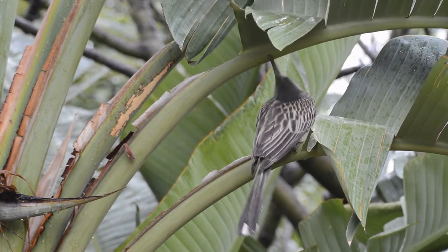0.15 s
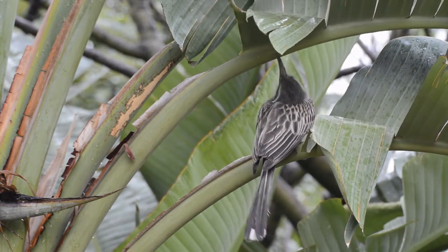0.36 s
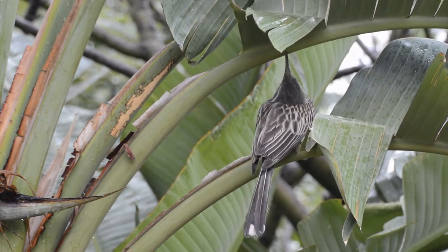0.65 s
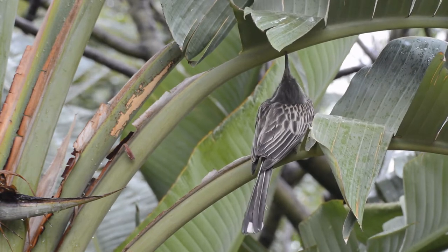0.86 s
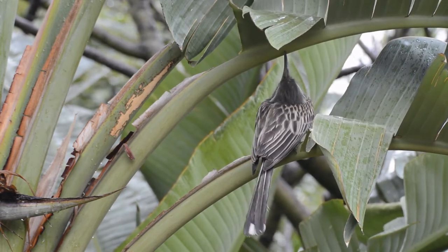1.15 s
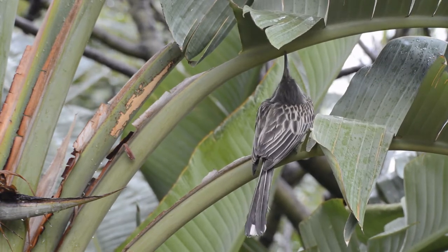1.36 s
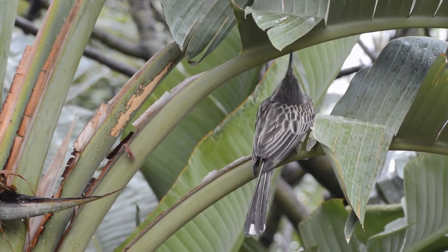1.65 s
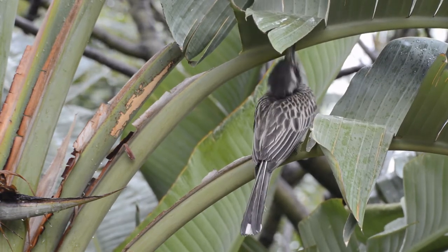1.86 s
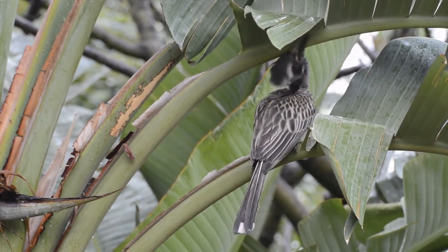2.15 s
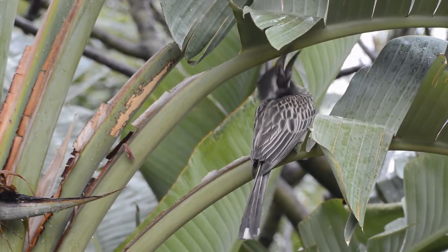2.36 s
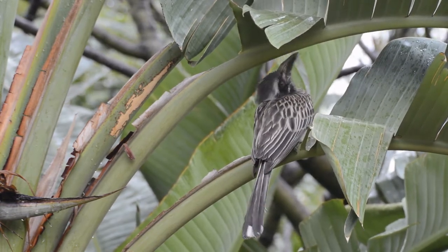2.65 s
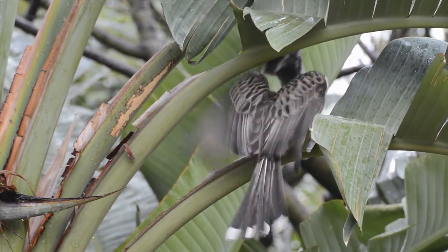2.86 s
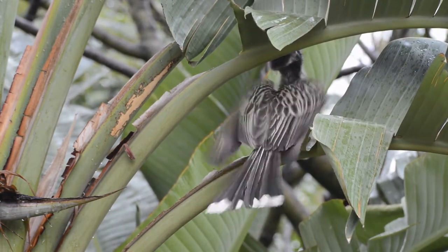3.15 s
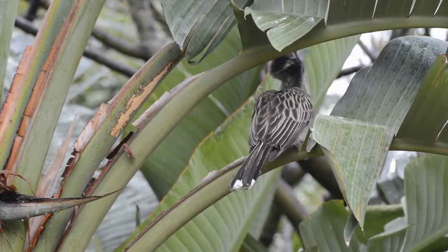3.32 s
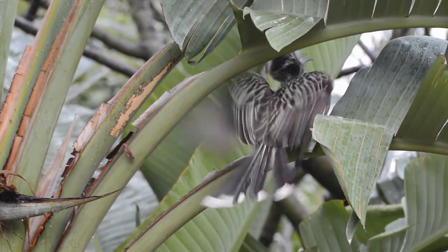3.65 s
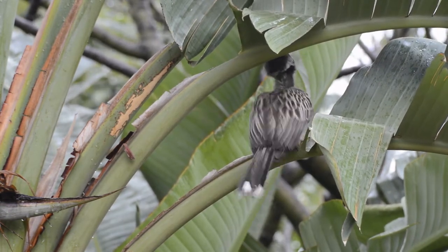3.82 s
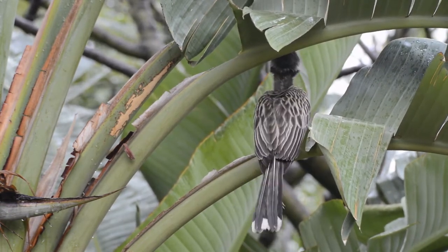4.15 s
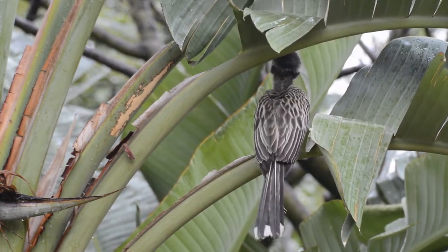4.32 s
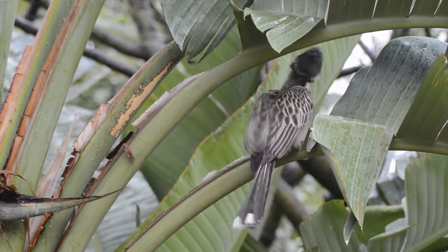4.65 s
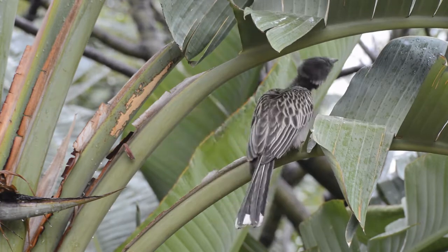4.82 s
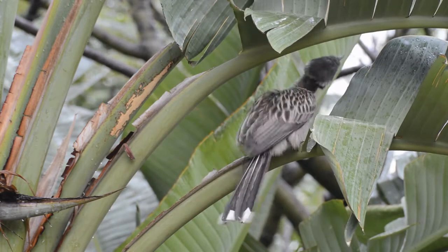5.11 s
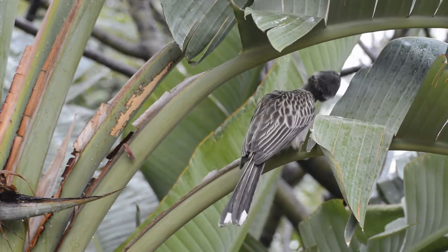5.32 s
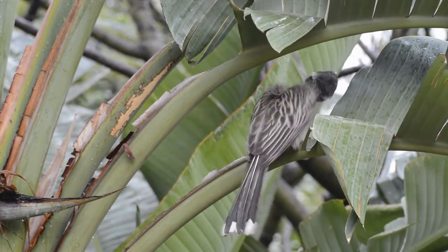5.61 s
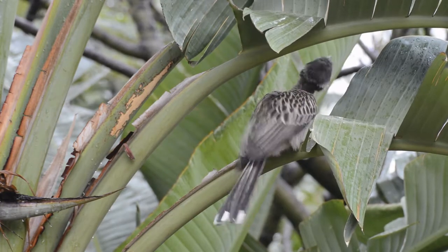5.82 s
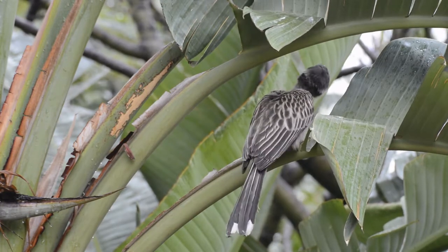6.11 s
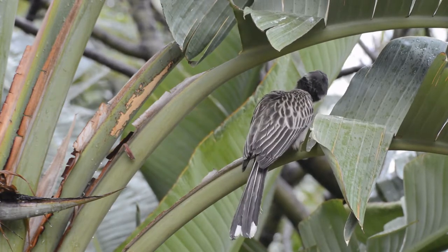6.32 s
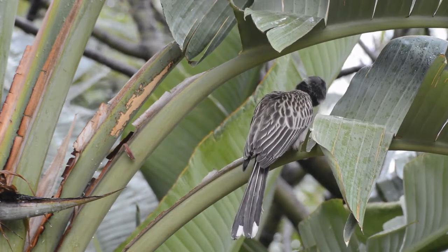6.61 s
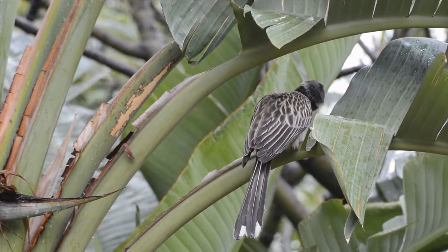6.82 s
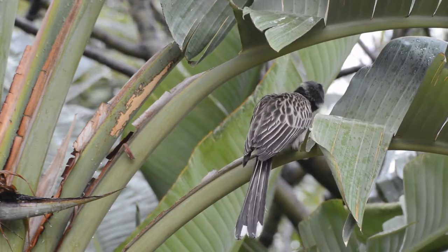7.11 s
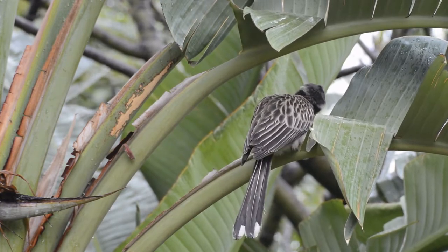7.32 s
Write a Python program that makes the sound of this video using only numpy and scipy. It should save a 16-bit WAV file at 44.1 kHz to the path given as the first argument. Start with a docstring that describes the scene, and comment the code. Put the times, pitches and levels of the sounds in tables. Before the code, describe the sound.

A quiet leafy garden in light rain: a dull, low, steady wash from distant foliage, a finer hiss nearby and small crisp drops tapping leaves. A tiny finch chirp opens it. Soft, low, flutey piping repeats roughly every 0.3 s until about 3.6 s, with faint pips early on. A dry, high insect buzz swells in pulses from 0.5 to 2 s, with weak bits until 3 s; muted dove coos come from 1.25 s. At 1.5 s a near bird whistles faintly, more clearly at 1.75 s. From 3 s two birds overlap in bright, gliding whistles, mostly falling, some leaping up and cracking into rasp between 3.8 and 5.7 s. They grow loudest from 4.8 s to the end at about 7.5 s. A brief wing puff comes at 6.7 s, a sharper finch chirp at 7.1 s. Trunks and a wall return short echoes.

```python
"""First come light rain, a finch chirp and soft hornbill piping; from 1.5 s two near hornbills whistle in
overlap. The place is a garden of broad leaves, with a stereo microphone; trunks and a wall return each whistled
note. The whistles are gliding sines with overtones, and rasp with half-pitch lines when the voice breaks. Rain
and drops are shaped noise; the insect is pulsed noise through wing resonances. Finch, soft piping, dove and
pips are gliding sines with a faint octave; the soft piping also carries thin 6th and 8th overtones. Source
levels, level_db, are set before the mix gains."""
import sys
import numpy as np
from scipy import signal
from scipy.fft import rfft, irfft, next_fast_len
from scipy.io import wavfile
from scipy.ndimage import uniform_filter1d, map_coordinates

SR = 44100
rng = np.random.default_rng(int(sys.argv[2]) if len(sys.argv) > 2 else 0)


def output_pcm(signal):
    """Save a mono or channel-first signal as 16-bit PCM at the path in sys.argv[1].

    Samples are clipped to [-1, 1] before scaling.
    """
    pcm = np.clip(np.atleast_2d(signal).T, -1, 1) * 32767
    wavfile.write(sys.argv[1], SR, np.round(pcm).astype(np.int16))


N = 329427  # samples, about 7.5 s


def amp(db):
    """Decibels to gain."""
    return 10 ** (np.asarray(db) / 20)


def unit(x):
    """Scales x to rms 1."""
    return x / np.sqrt(np.mean(x ** 2) + 1e-20)


def along(points, hz):
    """Interpolates (Hz, value) points on a log frequency axis."""
    f, v = np.transpose(points)
    return np.interp(np.log(hz + 1), np.log(f + 1), v)


def wobble(rate, size=N):
    """A smooth random curve with rate knots a second."""
    knots = rng.standard_normal(int(size * rate / SR) + 4)
    return map_coordinates(knots, [np.arange(size) * rate / SR])


def filtered(x, response):
    """Applies a complex response of frequency to x."""
    m = next_fast_len(N + SR // 2)
    return irfft(rfft(x, m) * response(np.fft.rfftfreq(m, 1 / SR)), m)[..., :N]


def resonances(modes):
    """Causal response of (Hz, width Hz, dB) modes, with alternating signs."""
    def response(f):
        total = 0
        for k, (centre, width, db) in enumerate(modes):
            damping = 1j * f * width
            total = total + (-1) ** k * amp(db) * damping / (centre ** 2 - f * f + damping)
        return total
    return response


def add(track, s, sound):
    """Mixes a sound into a track at time s."""
    part = track[round(s * SR):][:len(sound)]
    part += sound[:len(part)]


def whistles(table, octave_db, sag, flat):
    """Gliding sines with a faint octave; sag bends the glide, flat squares the swell."""
    out = np.zeros(N)
    for s, length, start_hz, end_hz, db in table:
        u = np.linspace(0, 1, round(length * SR))
        phase = 2 * np.pi * np.cumsum(start_hz + (end_hz - start_hz) * u ** sag) / SR
        octave = amp(octave_db) * (2 * start_hz < SR / 2) * np.sin(2 * phase)
        swell = np.abs(np.sin(np.pi * u)) ** flat
        add(out, s, amp(db) * swell * (np.sin(phase) + octave))
    return out


# Near hornbill notes: start_s, length_s, start_hz, turn_s, turn_hz, end_hz, peak_s, level_db, overtone_db
# (turn_s and peak_s count from the note's start)
HORNBILL_NOTES = [ (1.5, 0.079, 2830, 0.041, 2817, 2760, 0.044, -44, -74),
                  (1.755, 0.19, 2944, 0.048, 2925, 2510, .12, -27, -51),
                  (2.187, 0.06, 2554, 0.026, 2622, 2703, .033, -24, -60),
                  (2.252, 0.022, 2260, .014, 2258, 2280, .003, -28.5, -54),
                  (2.76, .13, 3110, 0.066, 2970, 2595, 0.12, -36.5, -66.5),
                  (3.05, 0.056, 2467, .025, 2491, 2510, 0.051, -17, -52),
                  (3.092, .16, 2855, 0.027, 2753, 2350, 0.038, -18.5, -57),
                  (3.465, .105, 2496, 0.053, 2515, 2460, 0.032, -24, -63.5),
                  (3.742, 0.047, 2325, 0.025, 2398, 2580, 0.054, -21, -52),
                  (3.862, 0.13, 2598, 0.1, 2482, 2310, .065, -19.5, -57),
                  (4.25, 0.087, 2510, 0.052, 2528, 2450, 0.033, -20, -61),
                  (4.512, 0.043, 2480, 0.025, 2542, 2570, 0.018, -17.5, -59),
                  (4.53, .21, 2914, 0.062, 2702, 2451, 0.044, -15, -57.5),
                  (4.885, 0.067, 2480, 0.033, 2630, 2640, 0.12, -11.5, -48),
                  (4.925, 0.039, 4160, 0.033, 3880, 3900, .003, -26.5, -54),
                  (5.082, 0.014, 2080, .009, 2010, 1960, .017, -29, -58),
                  (5.32, 0.095, 2550, 0.041, 2663, 2582, 0.069, -21.5, -57),
                  (5.595, 0.027, 2640, .017, 2627, 2610, 0.031, -20, -56),
                  (5.64, 0.18, 2956, .03, 2844, 2426, 0.009, -14, -55.5),
                  (5.957, 0.27, 2999, 0.18, 2399, 2369, 0.084, -10.5, -47),
                  (5.957, 0.069, 2500, 0.032, 2590, 2570, 0.066, -18, -51),
                  (6.355, 0.1, 2420, 0.033, 2585, 2515, 0.11, -16.5, -50.5),
                  (6.44, 0.11, 2876, 0.042, 2760, 2614, 0.034, -22.5, -56.5),
                  (6.535, 0.093, 2440, 0.062, 2423, 2412, 0.0025, -20.5, -54.5),
                  (6.83, 0.092, 2457, 0.038, 2371, 2220, 0.072, -11.5, -48.5),
                  (6.927, 0.15, 2630, 0.042, 2497, 2426, 0.052, -16.5, -49),
                  (7.247, 0.086, 2427, 0.034, 2310, 2182, 0.068, -14, -46.5),
                  (7.338, 0.17, 2486, 0.05, 2346, 2349, 0.0026, -14.5, -47.5)]
# Notes on which the voice breaks: the same columns, then break_s (how long it lasts), half_pitch_db
BROKEN_NOTES = [ (3.765, 0.13, 3280, 0.024, 3750, 3530, 0.063, -30.5, -57.5, 0.061, -40.5),
                (4.09, 0.17, 2687, 0.095, 3245, 3163, 0.13, -38, -67.5, 0.097, -46),
                (4.425, .175, 2634, 0.067, 3320, 3053, 0.093, -30, -56.5, 0.13, -43.5),
                (4.78, .305, 2730, .045, 3310, 2443, 0.18, -14.5, -53.5, 0.071, -41),
                (5.142, 0.23, 3275, .14, 2874, 2746, 0.094, -16, -48.5, 0.064, -46.5),
                (5.527, 0.223, 3158, .13, 2665, 2615, 0.059, -15.5, -44.5, 0.032, -54)]
# Overtones of the whistle: multiple, level_db on top of overtone_db
OVERTONE_LINES = [(2, 13), (3, 5), (4, 8), (5, -1), (6, -5)]
# Lines between them on a broken note: multiple, level_db on top of half_pitch_db
HALF_PITCH_LINES = [(.5, 2), (1.5, -6.5), (2.5, -11)]
SWELL_DB_PER_S, FADE_DB_PER_S = 130, 81  # towards and after the loudest moment
MEND_DB_PER_S = 300  # fall of the half-pitch lines after the break
OPEN_S, OPEN_DB = 0.015, 7  # overtones open over this time, from this far down per multiple
LEAP_S = 0.05  # on broken notes they take longer by turn_s, at most by this
GRAIN_DB = 2.5  # fast throaty flutter


def hornbills():
    """A near-sine swells and fades over overtones; a doubled voice period adds rasp and half-pitch lines."""
    out = np.zeros((2, N))
    for note in list(HORNBILL_NOTES) + list(BROKEN_NOTES):
        s, length, start_hz, turn_s, turn_hz, end_hz, peak_s, peak_db, over_db, *crack = note
        t = np.arange(round(length * SR)) / SR
        chance = lambda rate: wobble(rate, size=len(t))

        # shoots up or eases down to the turn, then slides straight on
        ease = np.sin(np.pi / 2 * np.minimum(t / turn_s, 1)) ** (1 if turn_hz > start_hz else 2)
        slide = np.maximum(t - turn_s, 0) / (length - turn_s)
        hz = start_hz + (turn_hz - start_hz) * ease + (end_hz - turn_hz) * slide

        rise_db = SWELL_DB_PER_S * np.maximum(peak_s - t, 0)
        fall_db = FADE_DB_PER_S * np.maximum(t - peak_s, 0)
        db = peak_db - rise_db - fall_db
        opening_s = OPEN_S + (min(turn_s, LEAP_S) if crack else 0)
        shut_db = OPEN_DB * np.clip(1 - t / opening_s, 0, 1)

        lines = [(k, over_db + g - k * shut_db) for k, g in OVERTONE_LINES]
        rasp = 0
        if crack:
            break_s, half_pitch_db = crack
            half_db = half_pitch_db - MEND_DB_PER_S * np.maximum(t - break_s, 0)
            rasp = np.clip(1 + (half_db - db) / 35, 0, 1)
            # half-pitch lines fade above the throat's first resonances
            lines += [(k, half_db + g - 0.023 * np.maximum(k * hz - 4900, 0)) for k, g in HALF_PITCH_LINES]

        jitter = 0.002 * chance(60) + (0.005 + 0.012 * rasp) * chance(250)
        smooth_hz = uniform_filter1d(hz, size=500, mode="nearest")
        phase = 2 * np.pi * np.cumsum(smooth_hz * (1 + jitter)) / SR
        edges = np.clip(t / 0.0036, 0, 1) * np.clip((length - t) / 0.013, 0, 1)
        breath = amp((1 + 4 * rasp) * chance(120)) * edges
        for track in out:  # the moving bill beams each overtone differently to the two microphone ports
            sway = phase + 0.072 * chance(13.5)
            tone = 0
            for k, line_db in lines:
                flicker_db = 4.36 * chance(37.0) + GRAIN_DB * chance(261.4)
                tone = tone + amp(line_db + flicker_db) * np.sin(k * sway) * (k * hz < SR / 2)
            add(track, s, breath * (amp(db) * np.sin(phase) + tone))
    return out + voice_cracks()


# Fast slurs into or out of a hornbill note: start_s, length_s, start_hz, end_hz, level_db
CRACK_SLURS = [(3.088, 0.013, 3230, 2800, -36), (3.762, 0.021, 2380, 3120, -21.5),
               (3.88, 0.056, 1714, 1420, -39), (4.58, 0.037, 1607, 1310, -41),
               (4.506, 0.017, 2900, 2440, -26), (4.882, 0.014, 3050, 2560, -23),
               (4.922, 0.022, 3076, 2770, -21), (5.64, 0.025, 3580, 2950, -31.5),
               (6.012, 0.017, 4080, 2900, -33), (6.438, 0.019, 3324, 2650, -32)]


def voice_cracks():
    """Quick grainy slurs as a hornbill's voice cracks."""
    grain = amp(2 * GRAIN_DB * wobble(500) - 4.5)
    return whistles(CRACK_SLURS, -31, sag=1.26, flat=0.77) * grain


# Returns from trunks and the wall: delay_s, level_db
TRUNK_AND_WALL = [(.012, 2), (.027, -3), (.103, -15.5), (.2, -19)]


def echoes(x):
    """Single returns from trunks and the wall, duller than the direct sound."""
    def response(hz):
        returns = sum(amp(db) * np.exp(-2j * np.pi * hz * s) for s, db in TRUNK_AND_WALL)
        return returns / (1 + 1j * hz / 5000)
    return filtered(x, response)


# Near drops on leaves: start_s, level_db, tap_db (a relative level for the low tap)
NEAR_DROPS = [(0.1386, -39, -3), (0.476, -46, 9), (0.4846, -47.5, 17), (0.605, -45, 6), (0.7652, -43, -4),
              (1.27, -43, 6), (1.553, -44, -4), (2.0657, -42, -2), (2.178, -44, 9), (2.2775, -43, -5),
              (2.606, -46, -6), (2.8527, -31.5, -24), (3.3268, -47, -2), (3.453, -40.5, 9.5),
              (4.04, -42, -10), (4.1294, -45, -17), (4.2782, -36, -9), (4.37, -47, 13)]


def drops():
    """A drop is a bright noise splash with a duller leaf tap; 220 small ones fall at random moments."""
    splash, tap = np.zeros((2, N)), np.zeros(N)
    t = np.arange(SR // 20) / SR
    patter = [(s * N / SR, -56 + 11 * u ** 3, -8) for s, u in rng.uniform(size=(220, 2))]
    decay = amp(-60 * t / 0.032) + 0.39 * amp(-60 * t / 0.078)
    onset = 1 - np.exp(-t / 0.00017)
    for s, db, tap_db in list(NEAR_DROPS) + patter:
        burst = amp(db) * decay * onset * rng.standard_normal((3, len(t)))
        add(splash[0], s, burst[0] + 0.41 * burst[1])
        add(splash[1], s, burst[0] - 0.15 * burst[1])
        add(tap, s, amp(tap_db) * burst[2])
    bright = filtered(splash, resonances([(12900, 30000, 0.019)]))
    return bright + filtered(tap, resonances([(5100, 2700, 0)]))


# Insect bouts: start_s, length_s, level_db
INSECT_BOUTS = [(0.473, 0.53, -42), (1.017, 0.49, -41.5), (1.529, 0.45, -41.5), (2.09, 0.16, -47),
                (2.61, 0.095, -45.5), (2.832, 0.18, -46)]
# Wing resonances of one filter pass: centre_hz, width_hz, level_db
WING_RESONANCES = [(7430, 1900, 21), (9500, 1800, 6)]
STROKES_PER_S = 72.3
BOUT_PEAK = 0.54  # loudest at this share of a bout
BOUT_SWELL_DB, BOUT_FADE_DB = 7, 28.5  # below the peak at start and end


def insect():
    """Steady wing strokes, two scrapes a stroke, rattle the wing resonances."""
    t = np.arange(N) / SR
    stroke = 2 * np.pi * STROKES_PER_S * t
    scrape = amp(5.9 * np.cos(stroke) + 7.4 * np.cos(2 * stroke)) * rng.standard_normal(N)
    wings = resonances(WING_RESONANCES)
    buzz = unit(filtered(scrape, lambda f: wings(f) ** 2))  # two passes
    level = np.zeros(N)
    for s, d, db in INSECT_BOUTS:
        times = [s, s + BOUT_PEAK * d, s + d]
        levels = [db - BOUT_SWELL_DB, db, db - BOUT_FADE_DB]
        level += amp(np.interp(t, times, levels, left=-120, right=-120))
    return uniform_filter1d(level, size=1200) * buzz


# Finch calls: start_s, level_db
FINCH_TIMES = [(.008, -46), (5.665, -49), (5.89, -52), (6.17, -50), (6.415, -52), (6.655, -54),
               (7.075, -34), (7.335, -52)]
# The two sweeps of a call: delay_s, length_s, start_hz, end_hz, level_db on top of the call's
FINCH_SWEEPS = [(.004, 0.044, 5520, 3200, 6), (0.016, .055, 7380, 4210, 4)]


def finch():
    """Each call is the same pair of falling, fluttering sweeps."""
    sweeps = [(s + lag, length, start_hz, end_hz, db + g)
              for s, db in FINCH_TIMES for lag, length, start_hz, end_hz, g in FINCH_SWEEPS]
    return whistles(sweeps, -24, sag=0.8, flat=0.7) * amp(2 * wobble(150))


# One wing beat: start_s, length_s, level_db
WING_BEAT = (6.672, 0.03, -32.5)


def flap():
    """One puff of air from the wings: a noise burst through two resonances."""
    s, length, db = WING_BEAT
    size = round(length * SR)
    puff = np.zeros(N)
    add(puff, s, np.hanning(size) * rng.standard_normal(size))
    return amp(db) * filtered(puff, resonances([(1740, 590, 6.9), (4900, 910, 3)]))


# Soft low hornbill notes: start_s, length_s, pitch_hz (middle of the glide), level_db
SOFT_HORNBILL_NOTES = [(0.139, 0.18, 1546, -47), (.46, 0.15, 1523, -45.5), (.77, 0.2, 1520, -48),
                       (1.1, 0.17, 1524, -46), (1.4, 0.16, 1514, -44.5), (1.72, 0.17, 1491, -44.5),
                       (2.16, .15, 1507, -45.5), (2.45, 0.14, 1528, -45.5), (2.77, 0.18, 1527, -42.5),
                       (3.15, 0.094, 1527, -40), (3.426, 0.22, 1558, -40), (5.971, 0.03, 1775, -48.5),
                       (6.255, 0.048, 1760, -54), (6.55, 0.038, 1650, -51), (6.812, 0.061, 1680, -47),
                       (7.09, 0.039, 1710, -47), (7.365, 0.056, 1700, -46)]
# Thin high overtones of the soft hornbill notes: multiple, level_db on top of the note's
SOFT_HORNBILL_OVERTONES = [(6, -20), (8, -18)]
# Dove coos: start_s, length_s, start_hz, end_hz, level_db
DOVE_NOTES = [(1.25, 0.16, 507, 491, -52.5), (1.44, .13, 538, 547, -45.5), (1.61, 0.049, 540, 632, -40),
              (1.66, 0.07, 643, 603, -44.5), (1.83, 0.047, 556, 663, -41.5), (1.88, 0.072, 656, 618, -47.5),
              (2.04, 0.061, 559, 540, -42), (2.84, 0.087, 642, 604, -49.5), (3.05, 0.031, 584, 658, -43),
              (3.33, 0.025, 614, 563, -41.5), (5.33, 0.079, 552, 611, -47), (5.53, 0.063, 667, 652, -46.5),
              (5.85, 0.087, 706, 665, -54)]
# Faint steady pips: start_s, level_db
PIP_TIMES = [(.3, -46), (.58, -44), (1.021, -50)]
PIPING_SAG_HZ = 31.6  # each soft hornbill note sinks this far
PIP_S, PIP_HZ = 0.052, 1084


def soft_birds():
    """Soft hornbill piping, dove and pips as gliding sines with a faint octave; the soft notes flutter a little
    and carry thin high overtones."""
    piping = [(s, d, hz + PIPING_SAG_HZ / 2, hz - PIPING_SAG_HZ / 2, db) for s, d, hz, db in SOFT_HORNBILL_NOTES]
    hornbill = whistles(piping, -26, sag=1.14, flat=0.22)
    dove = amp(-1.5) * whistles(DOVE_NOTES, -29, sag=1.25, flat=0.15)
    pips = whistles([(s, PIP_S, PIP_HZ, PIP_HZ, db) for s, db in PIP_TIMES], -30, sag=1, flat=0.6)
    soft = (hornbill + dove + pips) * amp(2.2 * wobble(30))
    for k, g in SOFT_HORNBILL_OVERTONES:  # these do not flutter
        overtone = [(s, d, k * start_hz, k * end_hz, db + g) for s, d, start_hz, end_hz, db in piping]
        soft = soft + whistles(overtone, -60, sag=1.33, flat=0.4)
    return soft


# Decay of the scattered sound: pitch_hz, t60_s
GARDEN_DECAY = [(500, 0.33), (2500, 0.4), (6000, 0.39), (12000, 0.22)]
# Tone of the scatter from leaves: pitch_hz, level_db
LEAF_SCATTER = [(600, 6), (1600, 2), (3000, 1.5), (6000, -0.5), (11000, 2)]
# Scattered sound, sides against front: pitch_hz, level_db
SIDE_SCATTER = [(500, -22), (2500, -11.5), (5000, -9.5), (10000, -17.5)]


def garden(x):
    """Leaves and trunks scatter the sound as a noise tail; each frequency dies at its own speed."""
    hz, t, z = signal.stft(rng.standard_normal((2, SR // 2)), SR, nperseg=256)
    z *= amp(along(LEAF_SCATTER, hz))[:, None]
    z[1] *= amp(along(SIDE_SCATTER, hz))[:, None]
    decay = amp(-60 * t / along(GARDEN_DECAY, hz)[:, None])
    front, sides = signal.istft(z * decay, SR, nperseg=256)[1]
    tail = np.array([front + sides, front - sides]) / np.linalg.norm(front)
    return signal.fftconvolve(x[None], tail, axes=1)[:, :N]


# Likeness of the left and right microphone channels: pitch_hz, likeness (1 is identical)
CHANNEL_LIKENESS = [(60, 0.998), (180, .995), (550, 0.975), (1650, 0.95), (4970, 0.72), (15000, .8)]


def rush(spectrum, patchy_db):
    """Stereo noise of rms 1 with patches of random gain over time and frequency."""
    z = signal.stft(rng.standard_normal((2, N)), nperseg=512)[2]
    field = uniform_filter1d(rng.standard_normal(z.shape[1:]), size=6, axis=0)
    field = uniform_filter1d(field, size=10, axis=1)
    pair = signal.istft(z * amp(patchy_db * unit(field)), nperseg=512)[1][:, :N]

    def response(hz):
        turn = np.arccos(np.clip(along(CHANNEL_LIKENESS, hz), -1, 1)) / 2
        return amp(along(spectrum, hz)) * [np.cos(turn), np.sin(turn)]
    mid, side = filtered(pair, response)
    return unit(np.array([mid + side, mid - side]))


# Course of the rain, before the gains in rain(): start_s, wash_db (far), hiss_db (near)
RAIN_LEVELS = [(0.0, -47.5, -65.5), (3.2, -48.5, -68), (5.2, -50.5, -62), (7.26, -50, -67),
               (7.47, -51, -61)]
# Relative spectrum of the far wash: pitch_hz, level_db
WASH_SPECTRUM = [(15, -81), (25, -42), (86, -7), (159, -13), (387, -9), (499, -4), (631, -7.5),
                 (1070, -6.5), (1380, -9.5), (1510, -5.5), (1670, -11), (1860, -11.5), (4000, -25),
                 (5200, -23.5), (8800, -120)]
# Relative spectrum of the near hiss: pitch_hz, level_db
HISS_SPECTRUM = [(1470, -24), (2500, -14), (2810, -18), (8200, -21), (8940, -23.5), (9960, -24),
                 (12700, -26), (16000, -23)]


def rain():
    """A dull noise wash from far foliage and a finer hiss nearby that spatters in quick flurries."""
    s, wash_db, hiss_db = np.transpose(RAIN_LEVELS)
    t = np.arange(N) / SR
    wash_gain = amp(np.interp(t, s, wash_db) + 2.5 + 0.097 * wobble(2.43))
    wash = wash_gain * rush(WASH_SPECTRUM, patchy_db=2.0)
    flurry_db = 0.49 * wobble(10) + 1.6 * np.minimum(np.abs(wobble(30)), 2) ** 1.63
    hiss_gain = amp(np.interp(t, s, hiss_db) + 15.0 + flurry_db)
    return wash + hiss_gain * rush(HISS_SPECTRUM, patchy_db=2.0)


def scene():
    """Mixes each source's direct sound with the garden's scatter, and adds the rain."""
    birds, ticks, buzz = hornbills(), drops(), insect()
    chirps, wing, soft = finch(), flap(), soft_birds()
    near_birds = (amp(1.5) * birds + amp(-7.0) * echoes(birds)) * amp([[0.3], [-0.3]])  # left, right
    direct = near_birds + ticks + amp(-3) * chirps + amp(1.0) * soft + wing
    direct = direct + buzz * amp([[-5.5], [-6.5]])
    to_garden = amp(-1.0) * birds[0] + amp(-2.0) * ticks[0] + amp(2.0) * buzz + wing
    to_garden = to_garden + amp(-5.5) * soft + amp(0.5) * chirps
    return direct + garden(to_garden) + rain()


TOP_HZ = 15900  # band limit


def record(dry):
    """The microphone loses the lowest bass; nothing is kept above the band limit."""
    return filtered(dry, lambda hz: (hz < TOP_HZ) / (1 + (45 / (hz + 1)) ** 4))


dry = scene()
out = record(dry)
output_pcm(out)
```